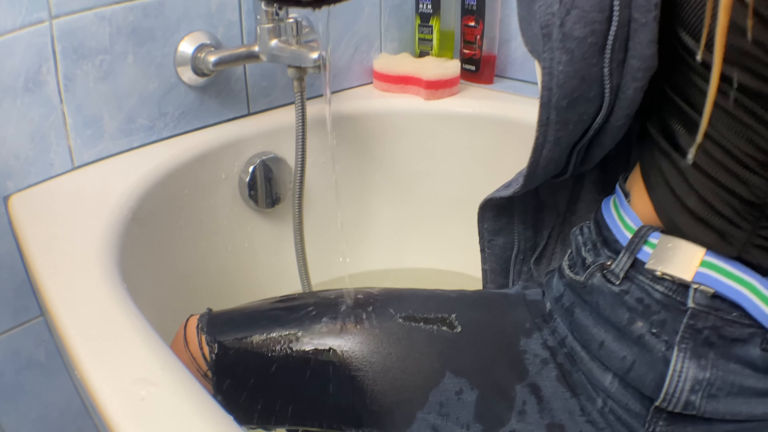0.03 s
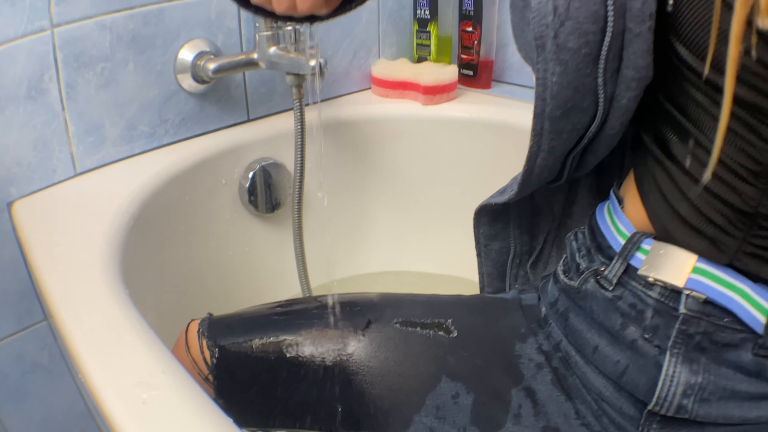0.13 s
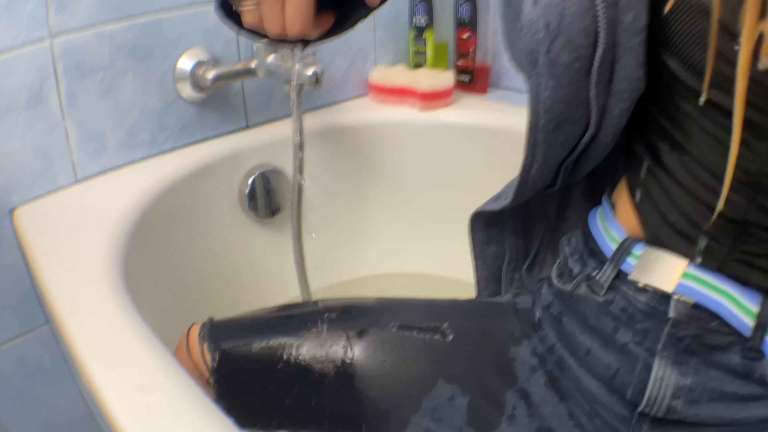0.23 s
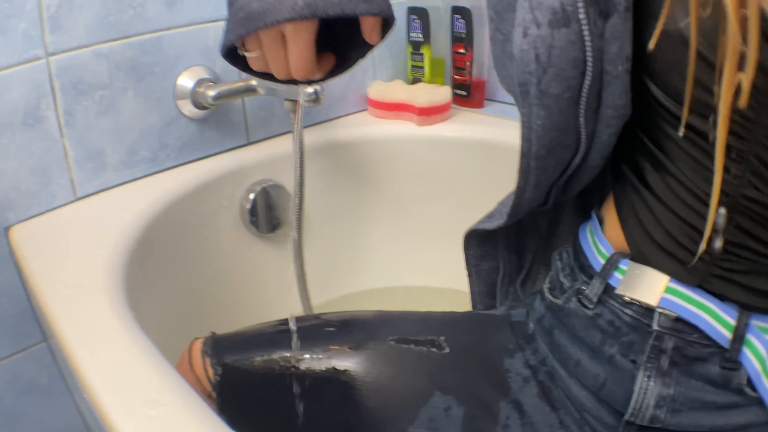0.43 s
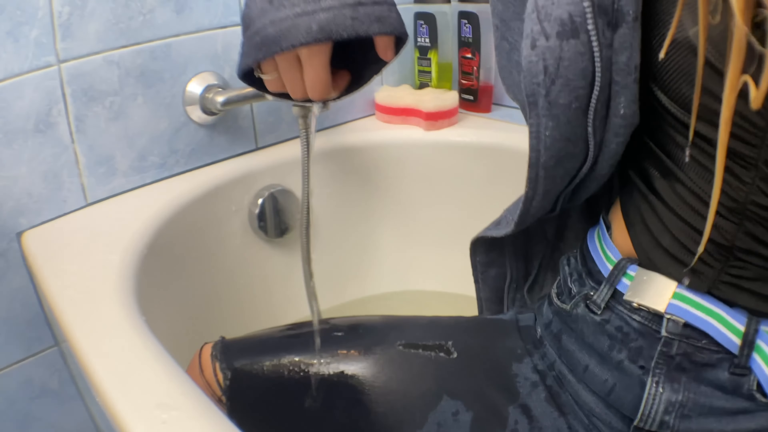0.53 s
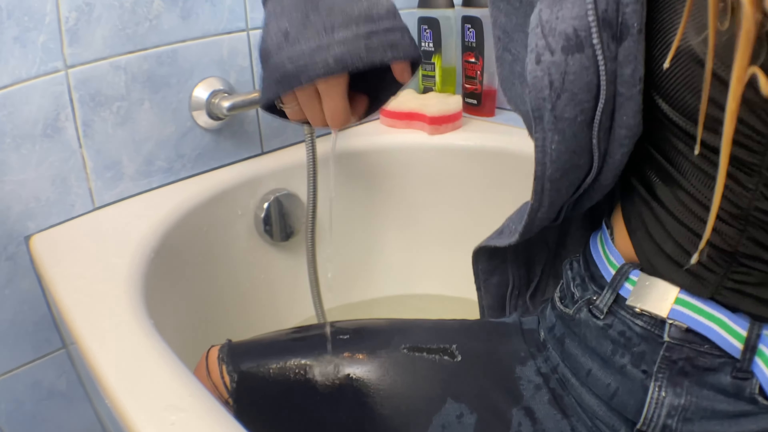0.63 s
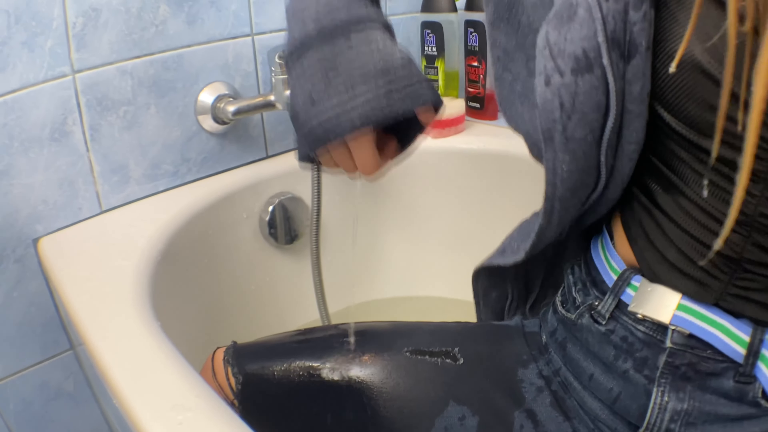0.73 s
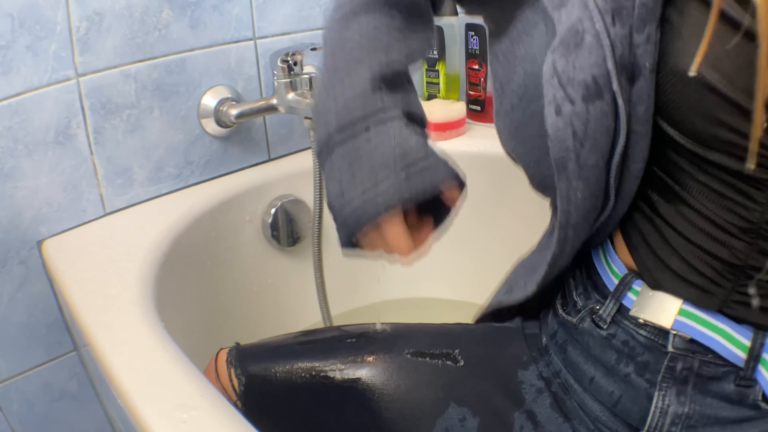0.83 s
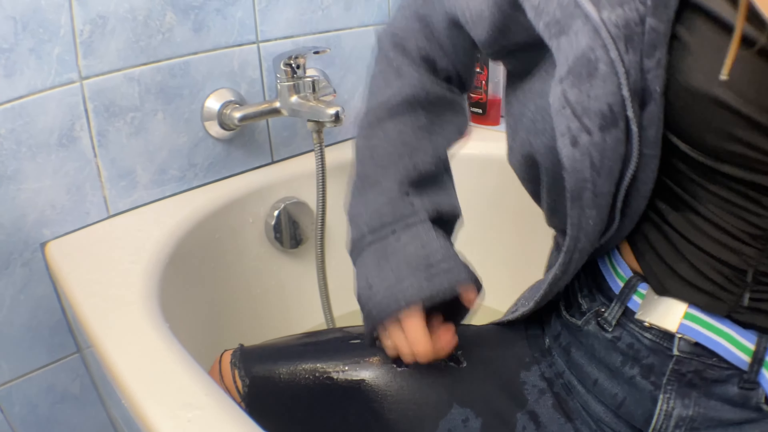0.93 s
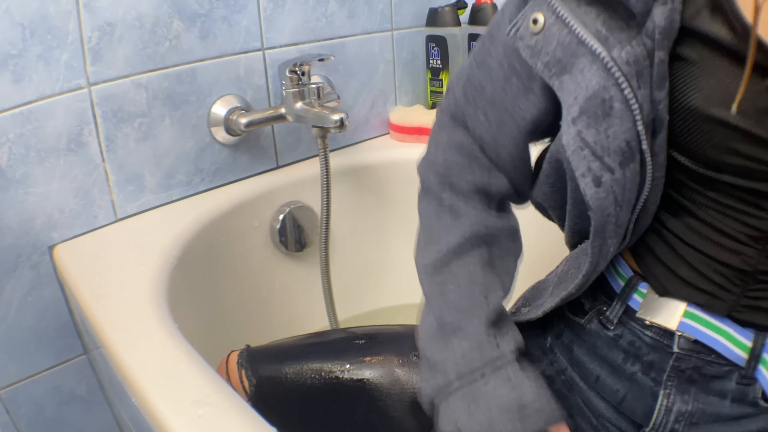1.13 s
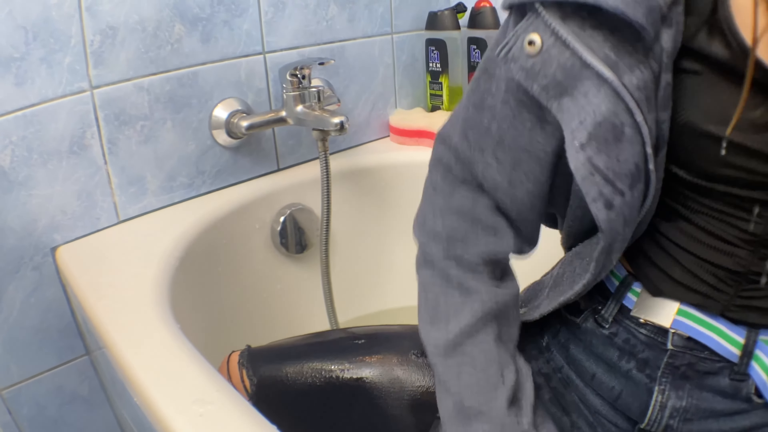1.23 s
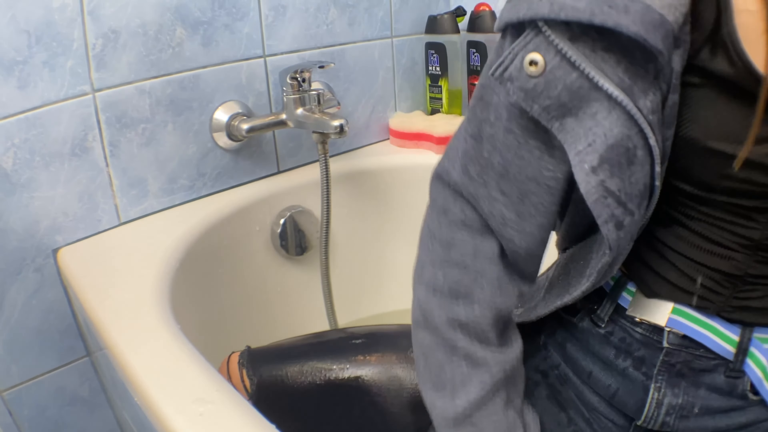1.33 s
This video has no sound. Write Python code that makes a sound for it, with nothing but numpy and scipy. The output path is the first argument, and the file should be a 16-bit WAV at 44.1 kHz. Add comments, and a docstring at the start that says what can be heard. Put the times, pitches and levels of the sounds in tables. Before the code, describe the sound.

After a few soft drips, a tap knocks loudly right by the microphone and the bathtub rings low for a moment. The last water then trickles and drips faintly into the bath in a quiet tiled room.

```python
"""A small tiled bathroom, where a tap is shut over a part-filled bathtub.
One close, hard knock, with lighter ones around it, overloads the microphone and leaves the tub humming.
The last water trickles and drips into the bath: trapped air rings as bubbles, and landing drops tick
and fizz. The tiled walls echo, and a low rumble of movement and a faint hiss lie underneath."""
import sys
import numpy as np
from scipy import signal
from scipy.fft import rfft, irfft
from scipy.io import wavfile

SR = 44100
rng = np.random.default_rng(int(sys.argv[2]) if len(sys.argv) > 2 else 0)


def int16_out(signal):
    """Quantize to a 16-bit WAV file."""
    q = np.round(np.clip(np.atleast_2d(signal).T, -1, 1) * 32767)
    wavfile.write(sys.argv[1], SR, q.astype(np.int16))


N = 61739

# how loud the rumble is over time: time_s, level_db
RUMBLE_LOUDNESS = [(0, -47), (.14, -79), (.30, -62.5), (.39, -48), (.47, -55.5), (.55, -46), (.63, -57.5),
                   (.68, -48.5), (.74, -50), (.80, -58.5), (.87, -51), (.94, -54), (1.13, -61), (1.22, -56),
                   (1.31, -54.5), (1.4, -57.5)]
# tone of the rumble: frequency_hz, relative_db
RUMBLE_TONE = [(20, -14.5), (45, -8.5), (76, 2), (115, -9.5), (200, -18.5), (380, -25), (700, -31.5),
               (1500, -49.5)]
# tone of the room's hiss: frequency_hz, relative_db
HISS_TONE = [(30, -2.5), (150, -3), (400, -7), (900, -19), (1700, -22), (3000, -26), (7000, -26),
             (12000, -32), (13300, -47), (16000, -49.5)]
# how loud the fine patter is over time: time_s, level_db
SPATTER_LOUDNESS = [(0, -53.5), (.05, -68), (.17, -64.5), (.28, -75.5), (.40, -62), (.47, -70.5),
                    (.57, -63), (.66, -70.5), (.78, -74), (.98, -70.5), (1.12, -81), (1.21, -72),
                    (1.4, -85)]
# tone of the fine patter: frequency_hz, relative_db
SPATTER_TONE = [(500, -9.5), (1000, -5), (1600, 8), (2800, -3.5), (4500, -3.5), (7000, -3), (9200, -16),
                (11000, 4.5), (12200, -4.5), (13300, -19), (16000, -23.5)]
# bubbles left by drops: start_s, pitch_hz, level_db
DROP_BUBBLES = [(.005, 1706, -40.5), (.029, 2073, -35), (.045, 1364, -38), (.096, 1547, -40),
                (.126, 1673, -30.5), (.149, 1574, -42), (.345, 1550, -47.5), (.375, 1430, -49),
                (0.401, 1470, -46.5), (.432, 1680, -45.5), (.479, 2100, -41.5), (.501, 735, -42.5),
                (.536, 1128, -40.5), (.550, 831, -40.5), (.566, 914, -39.5), (0.578, 990, -47.5),
                (.591, 1300, -45.5), (.598, 1620, -43), (.620, 1123, -51), (.686, 1195, -40),
                (.705, 1288, -41.5), (.716, 1668, -46), (.720, 2280, -43.5), (.844, 860, -57),
                (.879, 1396, -53), (.941, 1249, -38.5), (.970, 1402, -42.5), (0.97, 1620, -49),
                (1.189, 2260, -44), (1.196, 1728, -42), (1.227, 1707, -49), (1.264, 1693, -42.5),
                (1.341, 1663, -43)]
# drops that splash on wet cloth and enamel: start_s, level_db, low_edge_hz, high_edge_hz
DROP_SPLASHES = [(.010, -45, 9200, 12490), (0.1451, -37.5, 7450, 15500), (.168, -41, 8500, 12500),
                 (0.304, -53, 7200, 12000), (.356, -49.5, 3920, 5610), (.4975, -47, 4000, 8380),
                 (0.5263, -56.5, 9600, 12630), (0.5442, -34.5, 7500, 14200), (0.546, -46.5, 4350, 9100),
                 (.579, -54, 5900, 11800), (0.58, -44, 4960, 6000), (0.6867, -44.5, 4980, 13280),
                 (0.7936, -45, 6930, 12630), (0.803, -48, 7500, 14940), (.911, -47, 5490, 11720),
                 (1.0455, -40, 9470, 12850), (1.084, -46.5, 9150, 14150), (1.1942, -36, 9800, 12810),
                 (1.3331, -46, 9090, 13720)]
# short flurries of droplets: start_s, pitch_hz, level_db, decay_s
DROPLET_SPRAYS = [(0.028, 3200, -43.5, 0.015), (0.034, 4370, -61.5, 0.15), (.028, 1900, -49, 0.014),
                  (.018, 1007, -42, 0.0054), (.565, 6870, -46, 0.007), (.579, 5500, -49.5, 0.018),
                  (.688, 2290, -58, 0.027), (.910, 6500, -52, .012), (0.923, 2940, -64, 0.044),
                  (.985, 3500, -61, .035), (1.10, 4685, -61.5, .04), (1.165, 4200, -55.5, .022),
                  (1.236, 2700, -66.5, .03), (.095, 1610, -59.5, .06), (0.356, 1394, -58.5, 0.053),
                  (.548, 923, -56, 0.042), (1.198, 1747, -64, 0.056), (1.34, 1657, -64, .05)]
# blows on the tap and tub:
# start_s, thump_db, start_pitch_hz, slide_s, rise_s, hold_s, decay_s, crack_db, ring_db
BLOWS = [(0.1962, -15.5, 330, 0.0056, 0.016, 0.013, 0.0015, -65.5, -37),
         (0.2143, 1.5, 1060, .0018, 0.0022, 0.0095, 0.0029, -3.5, 3),
         (0.2440, -18, 560, 0.0028, 0.00081, 0.0074, .0022, -38.5, -35.5),
         (0.406, -43, 420, 0.0027, .002, 0.0062, 0.0042, -68, -36),
         (0.419, -37, 637, 0.0022, 0.0041, 0.0092, 0.003, -69, -49)]
# tone of a blow's sharp crack: frequency_hz, relative_db
CRACK_TONE = [(400, -9), (800, -0.5), (1050, -8.5), (1550, 4.5), (2000, -3.5), (2550, -2.5), (3300, -14.5),
              (3900, -11), (4900, -30), (6100, -13), (7800, -17), (9000, -30), (11000, -19.5), (15000, -33)]
# notes the tub rings at: pitch_hz, relative_db, fade_s (time to fall by 60 dB)
TUB_NOTES = [(72.36, -2.5, .065), (100.6, -4.5, 0.053), (161.4, -24.5, 0.38), (178.7, -27, 0.33),
             (573, -32, 0.045), (736, -35.5, 0.09)]
# tone of a heavy drop's slap: frequency_hz, relative_db
PLOP_TONE = [(200, -6.5), (650, -2.5), (1250, -3), (2000, -24), (4000, -32.5)]

RIGHT_LAG_S = .000041   # most sounds reach the right side this much later


def from_db(db):
    """Turn decibels into a number to multiply a sound by."""
    return 10 ** (np.asarray(db) / 20)


def unit_power(x):
    """Scale a sound so its average power is one."""
    return x / np.sqrt(np.mean(x ** 2) + 1e-20)


def since(start_s):
    """Seconds since the start, zero before it."""
    return np.maximum(np.arange(N) / SR - start_s, 0)


def loudness(points):
    """A volume curve that joins (time_s, level_db) points."""
    return from_db(np.interp(since(0), *np.transpose(points)))


def filtered(x, edge_hz, kind, order=2):
    """Keep the low part, the high part or one band of a sound."""
    return signal.sosfilt(signal.butter(order, edge_hz, kind, fs=SR, output="sos"), x)


def colour(x, tone):
    """Give a sound the tone in a table; white noise keeps its power."""
    hz, db = np.transpose(tone)
    size = 2 * N
    log_hz = np.log(np.fft.rfftfreq(size, 1 / SR) + 1)
    gain = unit_power(from_db(np.interp(log_hz, np.log(hz), db)))
    # fold the filter so it rings only after a sound, never before
    cepstrum = irfft(np.log(gain))
    cepstrum[1:N] *= 2
    cepstrum[N + 1:] = 0
    return irfft(rfft(x, size) * np.exp(rfft(cepstrum)))[..., :N]


def burst(start_s, decay_s):
    """White noise that starts suddenly and dies away."""
    t = since(start_s)
    return rng.standard_normal(N) * (t > 0) * np.exp(-t / decay_s)


def impacts(per_s, spread_db=3):
    """Tiny hits of uneven size at random moments."""
    sizes = from_db(spread_db * np.minimum(rng.exponential(1, N), 4)) * rng.choice([-1, 1], N)
    return sizes * (rng.random(N) < per_s / SR)


def ping(start_s, hz, db, decay_s, glide_per_s=0, rise_s=.002):
    """A pure note that dies away and can glide upwards."""
    t = since(start_s)
    envelope = (1 - np.exp(-t / rise_s)) * np.exp(-t / decay_s)
    return from_db(db) * envelope * np.sin(2 * np.pi * hz * t * (1 + glide_per_s * t / 2))


def place(x, pan_db, lag_s=RIGHT_LAG_S):
    """Make stereo: a pan above zero favours the left, and the right side arrives lag_s later."""
    delay = np.exp(-2j * np.pi * np.fft.rfftfreq(2 * N, 1 / SR) * lag_s)
    right = irfft(rfft(x, 2 * N) * delay)[:N]
    return np.array([x * from_db(pan_db), right * from_db(-pan_db)])


def widen(middle, side, width):
    """Mix two noises into left and right; more width makes the sides less alike."""
    return np.array([middle + width * side, middle - width * side])


def bathroom(x, echo_db, low_fade_s=.3, high_fade_s=.5, gap_s=.0069):
    """Add the dense echo of the tiled walls, longer and wider in the treble."""
    t = since(0)
    low = widen(*filtered(rng.standard_normal((2, N)), 4000, "low"), width=.54)
    high = filtered(rng.standard_normal((2, N)), 4000, "high")
    tail = (low * from_db(-60 * t / low_fade_s) + high * from_db(-60 * t / high_fade_s)) * (t > gap_s)
    echo = signal.fftconvolve(x, unit_power(tail) / np.sqrt(N), axes=1)[:, :N]
    return x + from_db(echo_db) * echo


def background():
    """A low rumble of movement swells and sinks over the steady hiss of the room."""
    def noise(tone, width):
        return unit_power(widen(*colour(rng.standard_normal((2, N)), tone), width))
    rumble = loudness(RUMBLE_LOUDNESS) * noise(RUMBLE_TONE + [(6000, -82)], width=.25)
    hiss = from_db(-64) * noise(HISS_TONE, width=1)
    return rumble + hiss


def spatter():
    """The thinning trickle breaks into a fine patter."""
    patter = unit_power(colour(impacts(per_s=760), SPATTER_TONE)) * loudness(SPATTER_LOUDNESS)
    return bathroom(place(patter, pan_db=-.28), echo_db=2.5)


def bubbles(decay_cycles=7.98):
    """Trapped air rings briefly and rises in pitch as it nears the surface."""
    rings = sum(ping(start_s, hz, db, decay_cycles / hz, glide_per_s=1.2)
                for start_s, hz, db in DROP_BUBBLES)
    return bathroom(place(rings, pan_db=-2, lag_s=.0001), echo_db=-1.5)


def splashes():
    """Landing drops make bright ticks; higher ticks stand for smaller drops."""
    ticks = np.zeros(N)
    for start_s, db, low_hz, high_hz in DROP_SPLASHES:
        tick = filtered(burst(start_s, decay_s=.0013) + 1e-18, [low_hz, high_hz], "band")
        boost = np.sqrt(SR / 2 / (high_hz - low_hz))   # gives back the power the filter takes
        ticks += from_db(db) * boost * tick
    return bathroom(place(ticks, pan_db=-.5), echo_db=-8.5)


def sprays(band_ratio=1.13, rise_s=.0088):
    """Clouds of droplets of similar size fizz around one pitch and fade."""
    fizz = np.zeros(N)
    for start_s, hz, db, decay_s in DROPLET_SPRAYS:
        t = since(start_s)
        droplets = filtered(impacts(per_s=3500), [hz / band_ratio, hz * band_ratio], "band")
        envelope = (1 - np.exp(-t / rise_s)) * np.exp(-t / decay_s)
        fizz += from_db(db) * envelope * unit_power(droplets)
    return bathroom(place(fizz, pan_db=-.3), echo_db=-3.5)


def thumps(end_hz=229.7, pan_fade_s=.009):
    """Each blow sends out a bending wave whose high notes arrive first, so the pitch slides down."""
    waves = np.zeros((2, N))
    for start_s, db, start_hz, slide_s, rise_s, hold_s, decay_s, _, _ in BLOWS:
        t = since(start_s)
        cycles = end_hz * t + (start_hz - end_hz) * slide_s * (1 - np.exp(-t / slide_s))
        envelope = (1 - np.exp(-t / rise_s)) * np.exp(-since(start_s + hold_s) / decay_s)
        pan_db = 6.5 * np.exp(-t / pan_fade_s)   # the high first waves favour the left
        waves += place(from_db(db) * envelope * np.sin(2 * np.pi * cycles), pan_db, lag_s=.00024)
    return waves


def cracks(rise_s=.0005, decay_s=.0024):
    """The hard contact of each blow makes a click wrapped in a short, gritty noise."""
    contacts = np.zeros(N)
    for start_s, *_, crack_db, _ in BLOWS:
        time_to_go = np.maximum(start_s - since(0), 0)
        swell = np.exp(-time_to_go / rise_s - since(start_s) / decay_s)
        contact = from_db(-23.5) * swell * rng.standard_normal(N)
        contact += from_db(-29.5) * burst(start_s, decay_s=.006)
        contact[int(start_s * SR)] += from_db(8)   # the click
        contacts += from_db(crack_db) * contact
    crack = colour(contacts, CRACK_TONE)
    dull = filtered(crack, 2300, "low", order=1)
    bright = crack - dull
    return place(dull, pan_db=6.5) + place(bright, pan_db=-.92)


def tub_hum(delay_s=.0012):
    """Just after each blow, the tub rings on at its own low notes."""
    hum = np.zeros(N)
    for start_s, *_, ring_db in BLOWS:
        t = since(start_s + delay_s)
        for hz, note_db, fade_s in TUB_NOTES:
            envelope = (1 - np.exp(-2 * hz * t)) * from_db(-60 * t / fade_s)
            hum += from_db(ring_db + note_db) * envelope * np.sin(2 * np.pi * hz * t)
    return place(hum, pan_db=-1, lag_s=.0008)


def squeak():
    """The metal of the tap rings briefly as it moves, just before the hard knock."""
    return place(ping(start_s=.2005, hz=2225, db=-33, decay_s=.0044), pan_db=-8.5, lag_s=0)


def plop():
    """One heavy drop lands with a dull slap."""
    slap = colour(from_db(-36) * burst(start_s=.492, decay_s=.0019), PLOP_TONE)
    return bathroom(place(slap, pan_db=-2, lag_s=0), echo_db=2)


def scene():
    """Everything heard at the edge of the bath."""
    knocks = bathroom(thumps() + cracks() + tub_hum(), echo_db=-38)
    return background() + spatter() + bubbles() + splashes() + sprays() + knocks + squeak() + plop()


def record(dry, cutoff_hz=16900):
    """The hard knock overloads the microphone and its peaks are flattened; the highest treble is cut."""
    clipped = np.clip(dry, -1, 1)
    return signal.sosfilt(signal.cheby2(12, 70, cutoff_hz, fs=SR, output="sos"), clipped)


dry = scene()
out = record(dry)
int16_out(out)
```